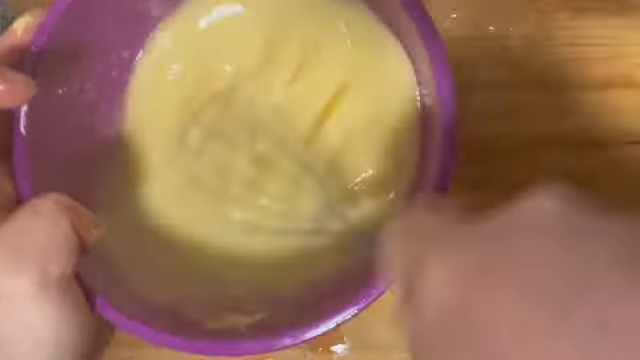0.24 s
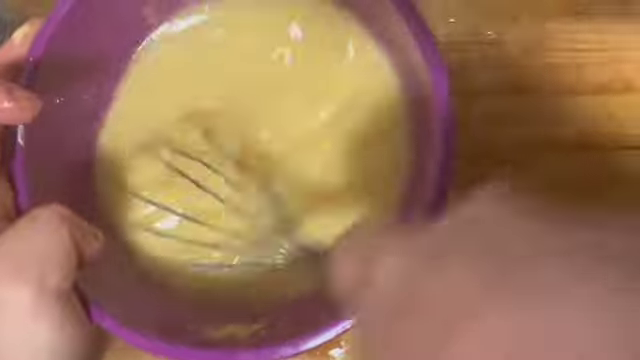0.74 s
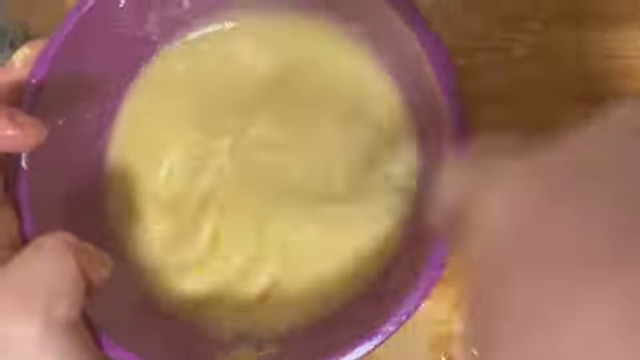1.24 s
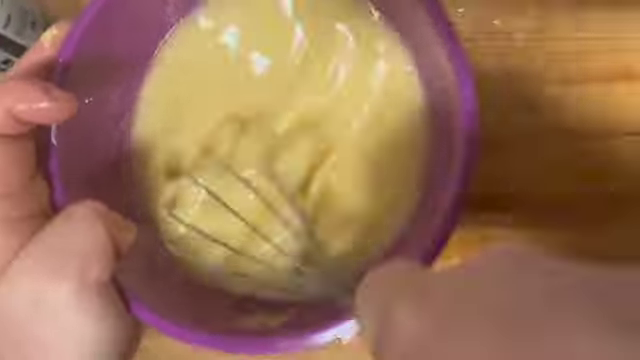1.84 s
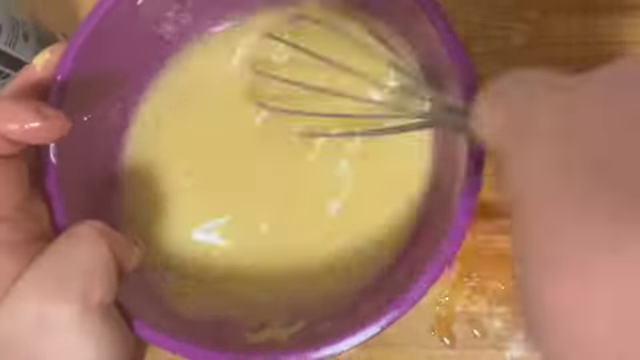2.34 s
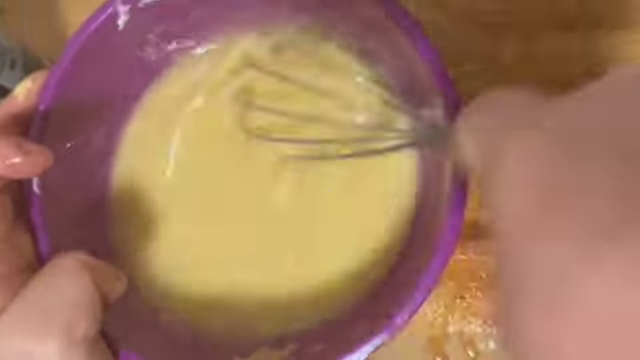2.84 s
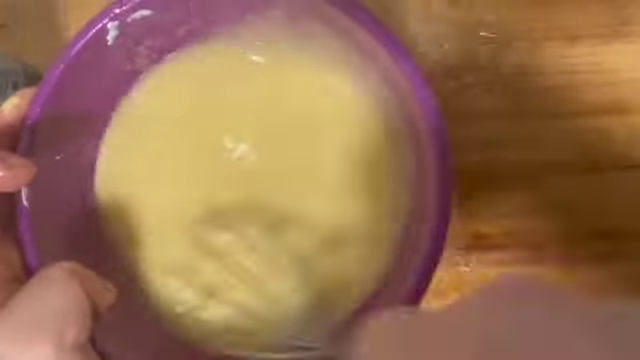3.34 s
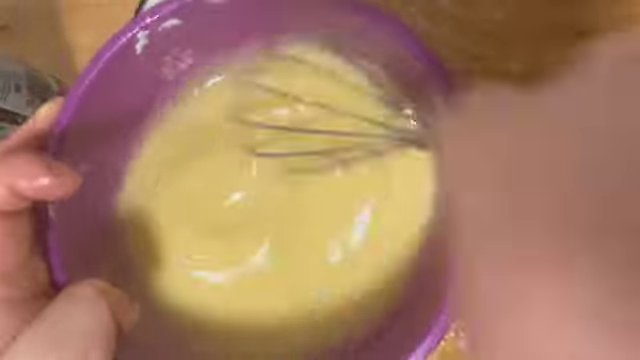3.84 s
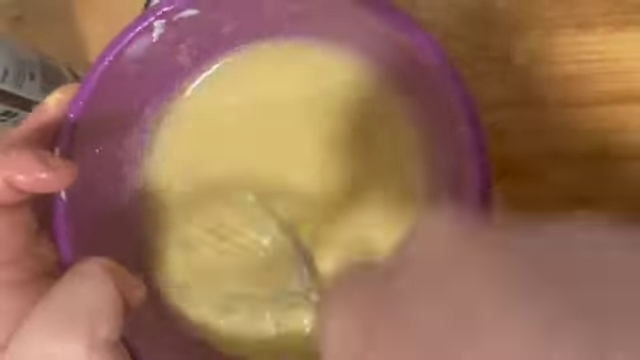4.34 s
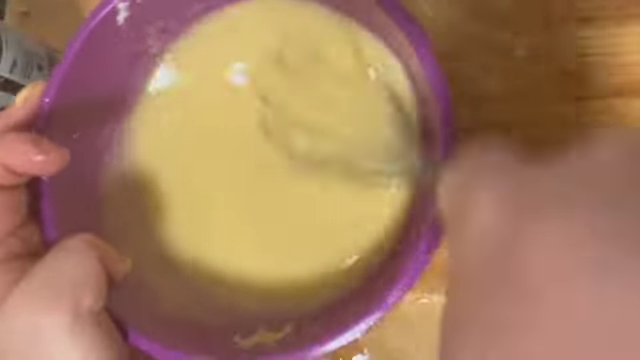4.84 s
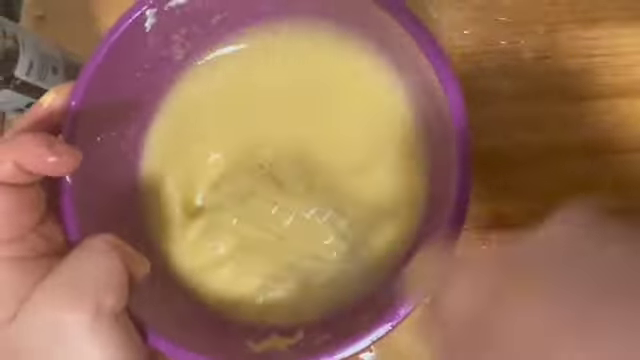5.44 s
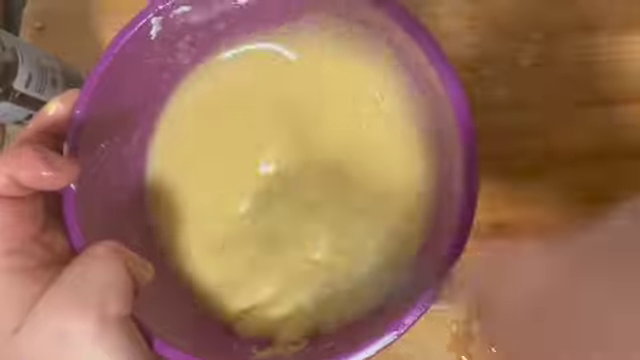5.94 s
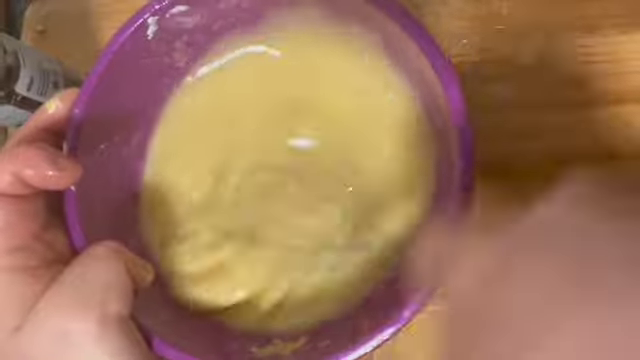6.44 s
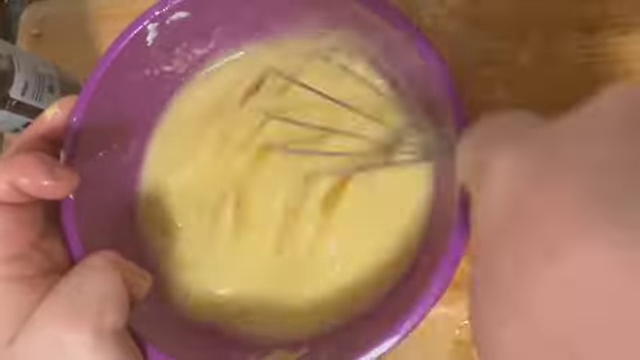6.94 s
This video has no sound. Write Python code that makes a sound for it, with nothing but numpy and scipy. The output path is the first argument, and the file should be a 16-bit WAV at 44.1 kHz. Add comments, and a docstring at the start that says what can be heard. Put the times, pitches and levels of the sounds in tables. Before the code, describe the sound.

A wire whisk beats thick batter in a plastic bowl on a wooden counter, about nine strokes a second. Each stroke is a wet plunge, a quick rasp of wires and a bright clack with a hollow plastic knock and low gloop. It slows and softens midway, then returns fast and strong. Close microphone, small kitchen, little echo.

```python
"""A small kitchen with a wooden counter, where a wire whisk beats thick batter in a plastic bowl.
About nine strokes a second, sparser midway: wires plunge in, bite one by one and strike the wall.
Each contact is a noise burst shaped by a cavity resonance and damped wall modes; air pockets torn open
in the batter are sine tones gliding downward. Granular noise makes the squish and drag, low noise
the rumble; random decaying echoes answer from bowl, counter and room, over faint room tone."""
import sys
import numpy as np
from scipy import signal
from scipy.fft import rfft, irfft, next_fast_len
from scipy.io import wavfile
from scipy.ndimage import map_coordinates

SR = 44100
rng = np.random.default_rng(int(sys.argv[2]) if len(sys.argv) > 2 else 0)


def unload_wav(signal):
    """Save mono or channel-first audio to the path in sys.argv[1] as 16-bit WAV at rate SR, clipped to [-1, 1]."""
    wavfile.write(
        sys.argv[1],
        SR,
        np.round(np.clip(np.atleast_2d(signal).T, -1, 1) * 32767).astype(np.int16),
    )


N = 317034  # length [samples]

# colour of wires snapping and dragging: (frequency [Hz], relative power density [dB per Hz])
SNAP_SPECTRUM = [(60, -15.5), (200, -41.5), (500, -1), (1200, 5), (1700, 0), (2600, 3), (3600, -1.5),
                 (4800, -6), (6500, -11), (8500, -15), (10500, -19), (12000, -30.5), (16000, -30)]
# whisk strokes, each a plunge, a sweep through the batter and a strike on the wall:
# (time [s], travel to the wall [s], plunge level [dB], sweep level [dB], strike level [dB],
#  strike length [s], gloop level [dB]), levels relative
WHISK_STROKES = [(0.0992, 0.0076, -31, -34.5, -31, 0.0074, -21.5),
                 (0.187, 0.047, -28.5, -41, -22, 0.0098, -20),
                 (0.326, 0.043, -26, -27.5, -19, 0.0077, -15.5),
                 (0.453, 0.017, -30, -28, -15.5, .0075, -20.5),
                 (0.5602, 0.032, -23, -29.5, -18.5, 0.0094, -20),
                 (0.652, 0.043, -36, -44, -16, 0.0074, -18),
                 (0.7773, 0.027, -36, -38.5, -14.5, 0.0059, -25),
                 (0.8709, 0.036, -20.5, -39, -13.5, .0064, -17.5),
                 (0.9897, 0.031, -25, -21.5, -15.5, 0.012, -11.5),
                 (1.0933, .0313, -26, -29, -14, 0.014, -12), (1.2175, 0.032, -23, -19, -16.5, 0.0096, -11),
                 (1.325, 0.033, -19.5, -26, -12.5, 0.011, -30),
                 (1.443, .034, -23.5, -19.5, -15.5, 0.011, -10.5),
                 (1.552, 0.027, -21.5, -30.5, -16, 0.019, -12),
                 (1.681, 0.024, -22.5, -25, -16, 0.0098, -16.5),
                 (1.7836, 0.042, -27.5, -16, -16, 0.0052, -14),
                 (1.911, 0.028, -25.5, -20.5, -19.5, 0.014, -15),
                 (2.045, 0.031, -29.5, -37.5, -37, 0.011, -20),
                 (2.122, 0.016, -26.5, -28.5, -21, 0.0082, -27),
                 (2.264, 0.043, -28.5, -25, -20.5, 0.011, -15),
                 (2.431, 0.0089, -33.5, -39, -23, 0.012, -19.5),
                 (2.536, 0.038, -25, -31.5, -20, 0.0073, -17.5),
                 (2.659, 0.027, -43, -39.5, -15.5, 0.0074, -18.5),
                 (2.781, 0.029, -23, -25.5, -18.5, 0.01, -18.5),
                 (2.8856, 0.044, -22, -32, -15, 0.0055, -22), (3.048, .032, -22, -25, -17, 0.011, -23),
                 (3.303, 0.0098, -39, -26, -22, 0.015, -23.5),
                 (3.4444, 0.022, -35.5, -34.5, -31, 0.013, -20.5),
                 (3.619, 0.019, -19.5, -26.5, -21, 0.017, -25), (3.753, 0.024, -37.5, -43, -30, .02, -44),
                 (3.9024, .024, -31.5, -42, -25, .013, -25.5), (4.208, 0.054, -30.5, -38, -30, 0.026, -47),
                 (4.385, 0.026, -39.5, -42.5, -35, 0.016, -28),
                 (4.573, .0196, -35, -33.5, -28.5, 0.016, -20),
                 (4.7283, 0.023, -44, -35, -28.5, 0.0078, -26),
                 (4.894, 0.038, -37, -38, -28.5, 0.0062, -46),
                 (5.027, 0.019, -29.5, -30, -24.5, 0.014, -33),
                 (5.1544, 0.019, -25, -56, -15.5, 0.00684, -16),
                 (5.24, .037, -23.5, -23.5, -25, 0.0066, -13),
                 (5.3638, .0352, -21.5, -45, -16.5, .0095, -9),
                 (5.473, 0.02, -22.5, -23.5, -22, 0.012, -11.5),
                 (5.611, .034, -20.5, -33, -18.5, 0.0047, -32),
                 (5.6958, 0.028, -32.5, -33.5, -22, 0.012, -51),
                 (5.812, 0.0071, -34.5, -34.5, -22, 0.0033, -19.5),
                 (5.876, .0245, -29.5, -27.5, -22.5, 0.0045, -23),
                 (5.951, 0.04, -34, -36, -21, 0.0069, -34),
                 (6.0536, 0.0086, -27.5, -30, -29.5, 0.0092, -24.5),
                 (6.106, .029, -19, -45, -17.5, .014, -13), (6.22, 0.02, -19.5, -25, -18.5, 0.011, -37),
                 (6.354, 0.017, -15.5, -19.5, -12, 0.0072, -30), (6.4492, 0.032, -22, -19, -15, .011, -19),
                 (6.564, 0.036, -25.5, -17.5, -14.5, 0.0089, -10.5),
                 (6.6696, 0.043, -26, -19.5, -20, 0.013, -8.5),
                 (6.7852, 0.024, -20.5, -24.5, -17, 0.021, -23.5),
                 (6.905, 0.024, -21, -24, -17, .012, -14.5), (7.0033, .034, -24.5, -38, -14, 0.01, -18),
                 (7.124, 0.031, -21, -19.5, -19.5, 0.013, -12)]


def amp(db):
    """Decibel law: amplitude grows tenfold every 20 dB."""
    return 10 ** (np.asarray(db) / 20)


def unit(x):
    """Normalisation to an rms value of 1."""
    return x / np.sqrt(np.mean(x ** 2) + 1e-20)


def along(points, hz):
    """Interpolation of (frequency [Hz], value) points on a logarithmic frequency axis."""
    f, v = np.transpose(points)
    return np.interp(np.log(hz + 1), np.log(f + 1), v)


def add(track, s, sound):
    """Superposition: a sound is summed into a track at time s."""
    part = track[max(round(s * SR), 0):][:len(sound)]
    part += sound[:len(part)]


def wobble(rate, size=N):
    """Band-limited randomness: a smooth curve through random knots, rate of them a second."""
    knots = rng.standard_normal(int(size * rate / SR) + 4)
    return map_coordinates(knots, [np.arange(size) * rate / SR])


def filtered(x, response):
    """Linear filtering: the spectrum is multiplied by a response of frequency."""
    m = next_fast_len(N + SR // 2)
    return irfft(rfft(x, m) * response(np.fft.rfftfreq(m, 1 / SR)), m)[..., :N]


def impulse(db):
    """Minimum phase: the folded cepstrum gives the causal response of a dB spectrum, energy 1."""
    cepstrum = irfft(np.log(amp(db)))
    half = len(cepstrum) // 2
    cepstrum[1:half] *= 2
    cepstrum[half + 1:] = 0
    h = irfft(np.exp(rfft(cepstrum)))
    return h / np.linalg.norm(h)


def squelch(spectrum, grain_db, clump_db):
    """Granular noise: tiny films of batter bursting in clumps modulate a coloured noise, rms 1."""
    films = rng.standard_normal(N) * amp(grain_db * wobble(900) + clump_db * wobble(60))
    return unit(filtered(films, lambda hz: amp(along(spectrum, hz))))


def bubbles(per_s, pitch_hz, cycles, size_db):
    """Bubble resonance: small bursts in thick batter, each a heavily damped tick; rms 1 overall."""
    out, t = np.zeros(N), np.arange(SR // 50) / SR
    number = int(per_s * N / SR)
    times = rng.uniform(0, N / SR, number)
    for s, (size, pitch, life) in zip(times, rng.standard_normal((number, 3))):
        hz = pitch_hz * np.exp(.55 * pitch)
        age = t * hz / (cycles * np.exp(1.2 * np.tanh(life)))
        envelope = np.sqrt(age) * np.exp(-age)
        add(out, s, amp(size_db * np.tanh(size)) * envelope * np.sin(2 * np.pi * hz * t))
    return unit(out)


def scattered(x, scatter_s, count=64):
    """Diffuse reflection: quick echoes inside the bowl, redrawn block by block as the whisk moves."""
    out, hop, t = np.zeros(N), N // count + 1, np.arange(SR // 50) / SR
    for start in range(0, N, hop):
        rim = rng.standard_normal(len(t)) * (1 - np.exp(-t / 0.0021)) * np.exp(-t / scatter_s)
        add(out, start / SR, signal.fftconvolve(x[start:start + hop], rim / np.linalg.norm(rim)))
    return out


def stirring(bubble_db):
    """Modulated noise: batter swishes round the wires, bubbles pop, the bowl rumbles on the counter."""
    # stirring between the blows: (time [s], squish relative level [dB], rumble relative level [dB])
    stir_levels = [(0.0, -42.5, -50.5), (0.5, -40.5, -45), (0.68, -41, -47), (1.04, -39.5, -47.5),
                   (1.72, -35, -49), (2.12, -43.5, -43), (2.8, -38, -49.5), (3.5, -49.5, -46),
                   (3.88, -43.5, -44), (4.28, -48.5, -53), (4.64, -46, -50), (5.22, -39, -48.5),
                   (5.51, -34, -41.5), (5.93, -39, -48.5), (6.25, -34, -43), (7.19, -35, -44)]
    # colour of the squish: (frequency [Hz], relative power density [dB per Hz])
    squish_spectrum = [(200, -8), (500, 0), (850, -4), (1600, 1.5), (2900, 3), (4500, -5), (8000, -9),
                       (11000, -17), (16000, -43)]
    # colour of the bowl rumbling on wood: (frequency [Hz], relative power density [dB per Hz])
    rumble_spectrum = [(20, -24), (36, -24), (50, 5), (60, -10), (70, -2), (82, -2.5), (115, 6), (145, 13),
                       (180, -7), (215, -6), (290, -8.5), (365, -4.5), (460, -25), (1000, -66)]
    s, *cols = np.transpose(stir_levels)
    squish_db, rumble_db = [np.interp(np.arange(N) / SR, s, c) for c in cols]
    squish = squelch(squish_spectrum, grain_db=2.5, clump_db=3.5) * amp(8.1 * np.tanh(wobble(18)))
    pops = bubbles(per_s=120, pitch_hz=2216, cycles=1.5, size_db=10)
    ticks = unit(scattered(pops, scatter_s=0.0012))
    rocking = rng.standard_normal(N) * amp(8.8 * np.tanh(wobble(22)))
    rumble = unit(filtered(rocking, lambda hz: amp(along(rumble_spectrum, hz))))
    batter = amp(squish_db - 3.5) * (squish + amp(bubble_db) * ticks)
    return batter + amp(rumble_db + 7.0) * rumble


def contacts(count=3):
    """Successive impacts: rows (time [s], level [dB], length [s], knock [dB], treble [dB]), taps first."""
    # a stray wire taps the bowl between strokes: (time [s], relative level [dB])
    stray_taps = [(0.04, -27.5), (0.258, -18.5), (2.235, -28), (3.226, -23), (3.8784, -29.5), (3.9833, -33),
                  (4.043, -27.5), (4.182, -37), (4.5064, -32), (4.824, -28), (4.986, -26), (5.117, -23),
                  (5.319, -30), (5.556, -23), (6.3193, -21.5)]
    # treble slope, higher when the wires meet bare wall: (time [s], level [dB])
    treble_course = [(0, -1.5), (1.0, 2), (1.6, -1), (1.95, 2), (2.45, 0), (2.85, 2), (3.32, 1.5),
                     (3.46, -5.5), (3.64, -0.5), (3.93, 1.5), (4.26, -4), (5.2, -1), (5.45, 1), (6.15, 0.5),
                     (6.55, 1), (7.19, 0)]
    plunge_s, tap_s = .006, 0.0034
    # wall knock and treble of each kind of contact, relative to its level [dB]
    plunge_knock_db, sweep_knock_db, strike_knock_db, tap_knock_db = -2, -4, -7.5, -5.5
    plunge_treble_db, sweep_treble_db, strike_treble_db, tap_treble_db = 1, 0.5, 4, 1.5
    wire_hold, wire_jitter = .5, .2  # contact length and timing scatter [shares of the gap between wires]
    wire_db = 1.5  # lift of the sweeping wires
    deep_knock = 0.2  # a strike that moves more batter knocks harder [dB per dB of gloop over strike]
    # a strike not braked by the sweep lands heavier and duller [dB per dB of strike over sweep]
    full_knock, full_dull = 0.19, 0.098
    braked_db = 9.5  # usual lead of the strike over the sweep
    rows = [(s, db, tap_s, tap_knock_db, tap_treble_db) for s, db in stray_taps]
    for s, travel, plunge_db, sweep_db, strike_db, length, gloop_db in WHISK_STROKES:
        hit_s = s + travel
        treble_db = np.interp(hit_s, *np.transpose(treble_course))
        rows.append((s, plunge_db, plunge_s, plunge_knock_db, plunge_treble_db + treble_db))
        # the following wires bite one by one on the way to the wall
        gap = travel / (count + 1)
        for lag in gap * (np.arange(count) + 1 + wire_jitter * rng.standard_normal(count)):
            db = np.interp(lag, [0, travel / 2], [plunge_db, sweep_db + wire_db])
            rows.append((s + lag, db, wire_hold * gap, sweep_knock_db, sweep_treble_db + treble_db))
        heavy_db = strike_db - sweep_db - braked_db
        knock_db = strike_knock_db + deep_knock * (gloop_db - strike_db) + full_knock * heavy_db
        bright_db = strike_treble_db + treble_db - full_dull * heavy_db
        rows.append((hit_s, strike_db, length, knock_db, bright_db))
    return rows


def rattle(length, t, wires_per_s, scatter_db, first_db, tear_s, smear, sink):
    """Impact clustering: wires land in turn, each tearing a film of batter; energy of rms 1 for length."""
    landings = np.append(0, rng.uniform(0, length, int(length * wires_per_s)))
    age = t - landings[:, None]
    landing_db = scatter_db * rng.standard_normal(len(landings)) + first_db * (landings == 0)
    power = amp(2 * landing_db) @ ((age >= 0) * np.exp(-np.abs(age) / tear_s))
    drag = np.exp(-np.maximum(t - length, 0) / (0.24 * length))
    # a short blow is crisp; a long one sinks softly into the batter
    cushion = 1 - np.exp(-t / (sink * length))
    envelope = cushion * np.sqrt(power / power.sum() + smear * drag / drag.sum())
    burst = envelope * rng.standard_normal(len(t))
    return burst * np.sqrt(length * SR) / np.linalg.norm(burst)


def smacks(touches, cavity_hz, cavity_spread, cavity_db, cavity_width, colour_db, ring_scatter_db,
           size=1024):
    """Modal excitation: each blow snaps with its own colour and rings the wall from a new spot."""
    # modes of the loaded plastic bowl: (frequency [Hz], relative level [dB], 60 dB decay time [s])
    bowl_modes = [(360, -33, .11), (361.8, -7, 0.19), (568, -19.5, 0.21), (561.4, -6, 0.12),
                  (800, -43, .08), (826, -4, 0.11), (888, 1, 0.043), (908, 1, 0.024), (1207, -13.5, 0.12),
                  (1460, -5.5, 0.03)]
    snaps, knocks = np.zeros(N), np.zeros(N)
    t, ring_t = np.arange(SR // 20) / SR, np.arange(SR // 7) / SR
    hz = np.fft.rfftfreq(size, 1 / SR)
    mode_hz, mode_db, t60 = np.transpose(bowl_modes)[:, :, None]
    fade = amp(-60 * ring_t / t60)
    for s, db, length, knock_db, treble_db in touches:
        length = max(length, .002)
        force = rattle(length, t, wires_per_s=300, scatter_db=1.0, first_db=2, tear_s=0.00095,
                       smear=0.41, sink=0.038)
        # the gap behind the wires resonates, with smaller chance pockets round it
        gap_hz = cavity_hz * np.exp(cavity_spread * rng.uniform(-0.9, 1))
        cavity = cavity_db * np.exp(-(np.log((hz + 1) / gap_hz) / cavity_width) ** 2)
        chance = rng.standard_normal(size)
        pockets = colour_db * map_coordinates(chance, [np.sqrt(hz / 8)], mode="wrap")
        # bare wire on plastic is bright, a blow deep in the batter is dull
        brightness = treble_db * along([(3000, 0.016), (7000, 1.66), (14000, 1.85)], hz)
        colour = impulse(along(SNAP_SPECTRUM, hz) + cavity + pockets + brightness)
        add(snaps, s, amp(db) * signal.fftconvolve(force, colour))
        # sloshing batter shifts the wall's modes and damps the free ring
        strength, detune = rng.standard_normal((2, len(bowl_modes), 1))
        tones = np.sin(2 * np.pi * mode_hz * (1 + 0.015 * detune) * ring_t)
        modes = amp(mode_db + ring_scatter_db * strength) * fade * tones
        wall = modes.sum(0) * (1 + np.exp(-ring_t / 0.022))
        knock = signal.fftconvolve(force, wall)
        add(knocks, s, amp(db + knock_db) * knock * np.sqrt(length * SR) / np.linalg.norm(knock))
    return amp(2.0) * snaps + amp(4.0) * knocks


def dragging(touches, lag_s, rise_s, fall_s, drag_db):
    """Viscous drag: wires plough through batter round each blow, most of all round the long ones."""
    effort = np.zeros(N)
    for s, db, length, *_ in touches:
        add(effort, s + length / 2 + lag_s, [amp(2 * db) * length ** 2 / fall_s * SR])
    t = np.arange(-SR // 10, SR // 10) / SR
    sweep = np.exp(-np.abs(t) / np.where(t < 0, rise_s, fall_s))
    effort = np.abs(signal.fftconvolve(effort, sweep / sweep.sum(), "same"))
    return amp(drag_db) * np.sqrt(effort) * squelch(SNAP_SPECTRUM, grain_db=4.0, clump_db=4)


def air_pockets():
    """Cavity opening: one gloop at the plunge, another near the loudest contact; (s, dB, starting Hz)."""
    # further gloops, some during strokes and some between them: (time [s], relative level [dB])
    further_gloops = [(0.187, -14), (0.281, -19), (3.485, -22.5), (3.826, -17), (3.901, -21), (4.224, -21),
                      (4.474, -22), (4.526, -25), (4.829, -24), (4.956, -22.5), (5.439, -27)]
    entry_hz, stroke_hz, further_hz = 940, 1102, 754  # starting pitches
    entry_gloop_db = -2  # gloop at the plunge, relative to the plunge
    rows = [(s, db, further_hz) for s, db in further_gloops]
    for s, travel, plunge_db, sweep_db, strike_db, _, gloop_db in WHISK_STROKES:
        loudness = amp([plunge_db, sweep_db, strike_db]) ** 5
        loudest = np.average([0, .5, 1], weights=loudness)  # share of the travel
        rows.append((s, plunge_db + entry_gloop_db, entry_hz))
        rows.append((s + loudest * travel, gloop_db, stroke_hz))
    return rows


def gloops(open_hz, life, rough, thump_db):
    """Cavity resonance: pitch falls as a pocket opens, wet walls flutter, slosh thumps the bowl's seat."""
    # resonances of the bowl on the counter: (frequency [Hz], bandwidth [Hz], relative level [dB])
    seat_modes = [(120, 14, 7), (139.7, 9.3, 7.5), (203.5, 18, 1.5), (247, 3, 1.5), (369.4, 11, -3)]
    opening_s = 0.003997  # central time constant of opening, scattered below
    out, t = np.zeros(N), np.arange(SR // 10) / SR
    for s, db, start_hz in air_pockets():
        opening = opening_s * np.exp(0.25 * rng.uniform(-1.03, 1))
        end_hz = open_hz * np.exp(0.17 * rng.standard_normal())
        glide = end_hz + (start_hz - end_hz) * np.exp(-t / opening)
        pitch = glide * np.exp(0.2104 * wobble(376, len(t)))
        swell = (1 - np.exp(-2 * t / opening)) * np.exp(-t / (life * opening))
        flutter = 1 + rough * wobble(414, len(t))
        add(out, s, amp(db) * swell * flutter * np.sin(2 * np.pi * np.cumsum(pitch) / SR))

    def seat(f):
        """Driven resonance: a sum of second-order band-pass responses."""
        return sum(amp(db) * 1j * f * w / (c * c - f * f + 1j * f * w) for c, w, db in seat_modes)

    return filtered(out, lambda f: amp(-2.0) + amp(thump_db) * seat(f))


def counter(x, echo_db, count=8):
    """Early reflection: counter top and nearby cupboards return a few quick echoes of either sign."""
    out = x.copy()
    for delay, sign in zip(rng.uniform(0.0024, 0.01567, count), rng.choice([-1, 1], count)):
        add(out, delay, sign * amp(echo_db) * x)
    return out


def tail(decay):
    """Diffuse reverberation: noise of energy 1, each frequency dying at its own speed."""
    hz, t, z = signal.stft(rng.standard_normal(SR // 2), SR, nperseg=256)
    h = signal.istft(z * amp(-60 * t / along(decay, hz)[:, None]), SR, nperseg=256)[1]
    return h / np.linalg.norm(h)


def kitchen(x, delay_s, count=24):
    """Room reverberation: a delayed answer, redrawn block by block as hand and bowl move."""
    # decay of the small kitchen: (frequency [Hz], 60 dB decay time [s])
    room_decay = [(100, 0.85), (400, 0.27), (1500, 0.23), (4000, 0.16), (12000, 0.18)]
    out, hop = np.zeros(N), N // count + 1
    for start in range(0, N, hop):
        answer = signal.fftconvolve(x[start:start + hop], tail(room_decay))
        add(out, start / SR + delay_s, answer)
    return out


def scene():
    """Mid-side superposition: whisk, batter and room, nearly centred, over faint room tone."""
    # filter on the side signal: (frequency [Hz], gain [dB])
    side_gain = [(100, -43), (220, -45), (450, -15.5), (900, -14.5), (1400, -11.5), (2800, -4), (5500, -7),
                 (10000, -7), (15000, -2)]
    # colour of the faint room tone: (frequency [Hz], relative power density [dB per Hz])
    air_spectrum = [(20, -14), (100, -25), (500, 4), (3000, -13), (16000, -48)]
    touches = contacts()
    slosh = counter(gloops(open_hz=152, life=1.84, rough=0.44, thump_db=5.5), echo_db=-13.5)
    blows = smacks(touches, cavity_hz=2536, cavity_spread=0.83, cavity_db=6.5, cavity_width=0.23,
                   colour_db=3.5, ring_scatter_db=3.5)
    blows = blows + amp(-3.0) * slosh
    # high-pass at 100 Hz: the blows and gloops have little deep bass
    blows = signal.sosfilt(signal.butter(3, 100, "high", fs=SR, output="sos"), blows)
    drag = dragging(touches, lag_s=0.0017, rise_s=0.01, fall_s=0.0058, drag_db=-10)
    close = blows + drag + stirring(bubble_db=-3)
    mid = close + amp(-12) * kitchen(blows, delay_s=.005)
    side = amp(-3) * scattered(close, scatter_s=0.0015) + amp(-10.0) * kitchen(blows, delay_s=.005)
    side = filtered(side, lambda hz: amp(along(side_gain, hz)))
    noise = rng.standard_normal((2, N))
    air = unit(filtered(noise, lambda hz: amp(along(air_spectrum, hz))))
    return np.array([mid + side, mid - side]) + amp(-63) * air


def record(dry):
    """Band limitation: peaks are clipped at full scale, then all from 16100 Hz upward is removed."""
    return filtered(np.clip(dry, -1, 1), lambda hz: hz < 16100)


dry = scene()
out = record(dry)
unload_wav(out)
```